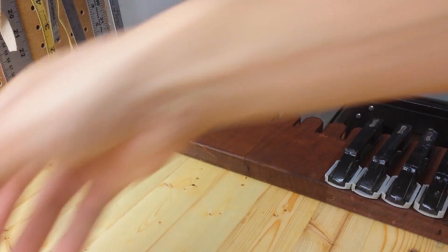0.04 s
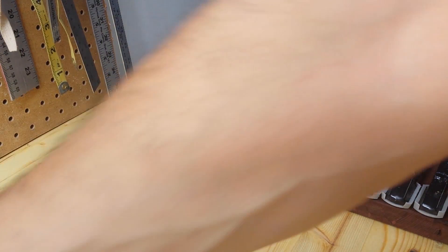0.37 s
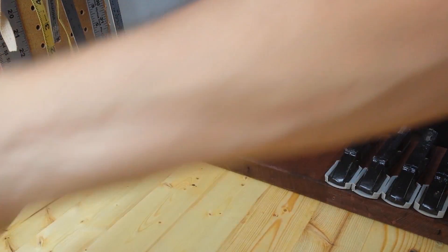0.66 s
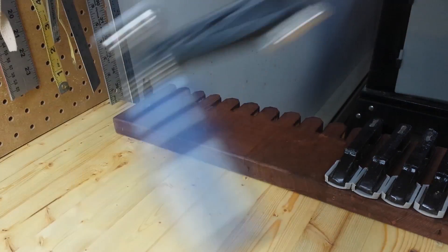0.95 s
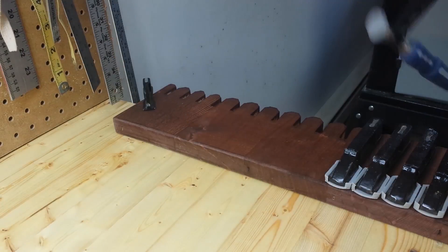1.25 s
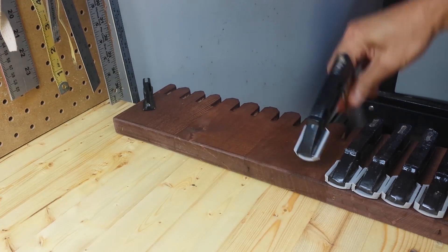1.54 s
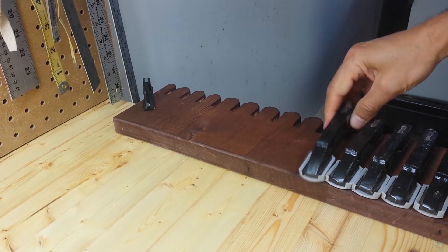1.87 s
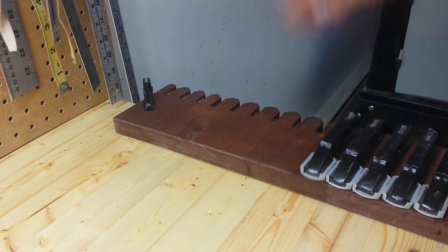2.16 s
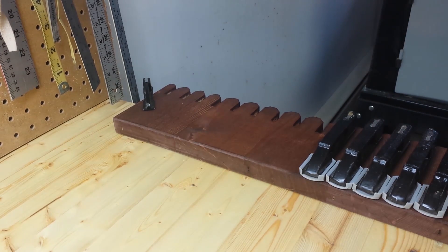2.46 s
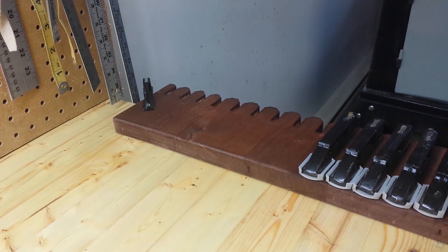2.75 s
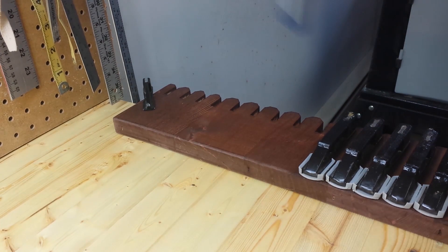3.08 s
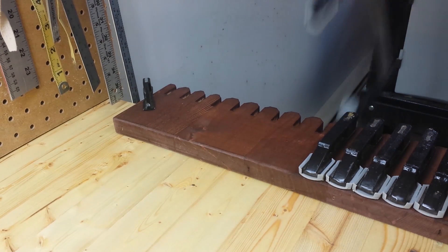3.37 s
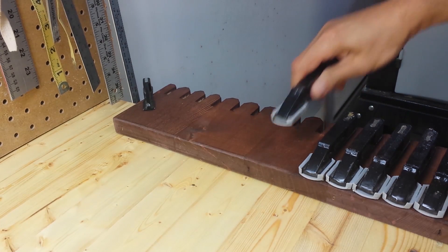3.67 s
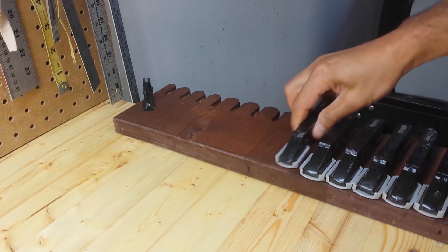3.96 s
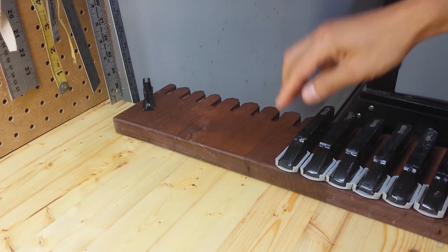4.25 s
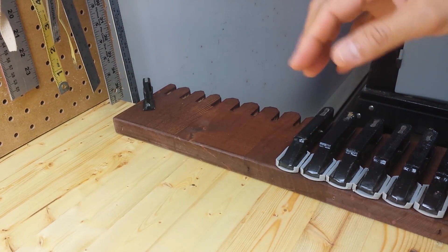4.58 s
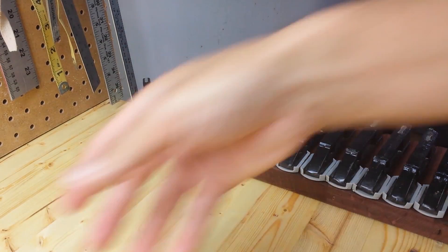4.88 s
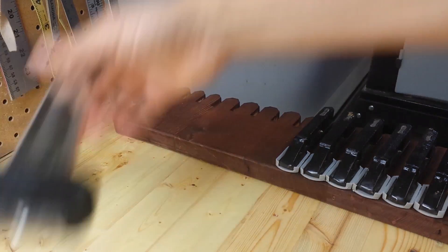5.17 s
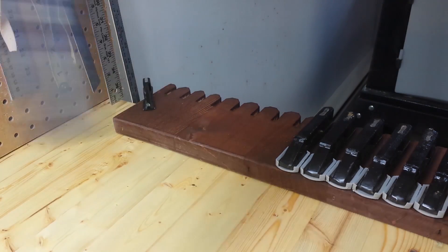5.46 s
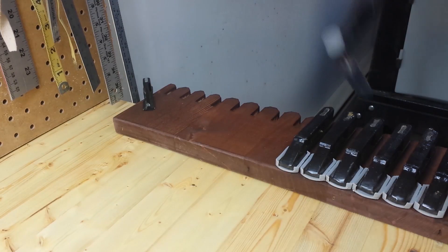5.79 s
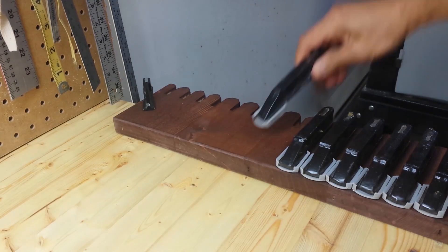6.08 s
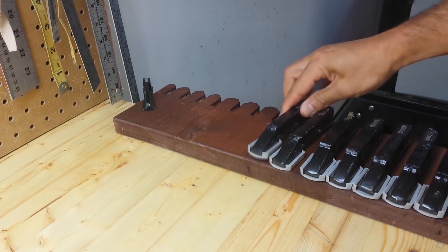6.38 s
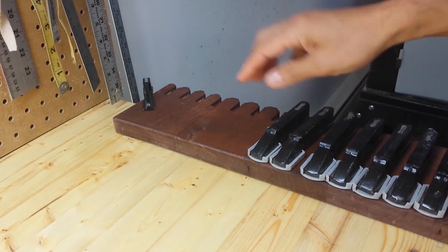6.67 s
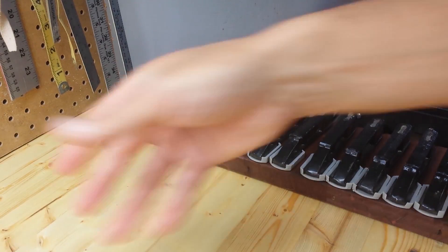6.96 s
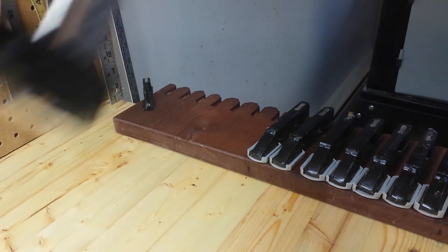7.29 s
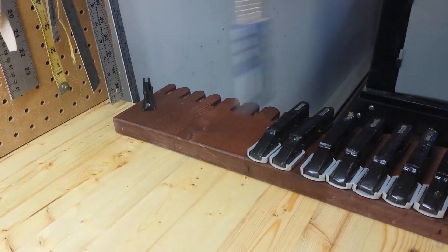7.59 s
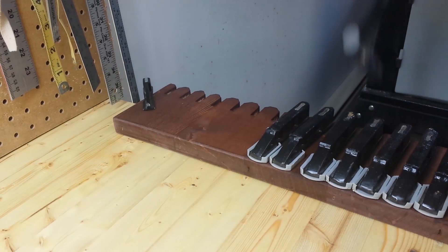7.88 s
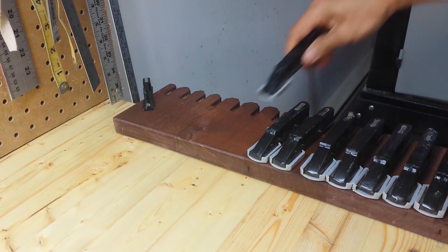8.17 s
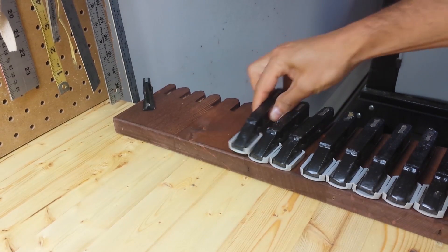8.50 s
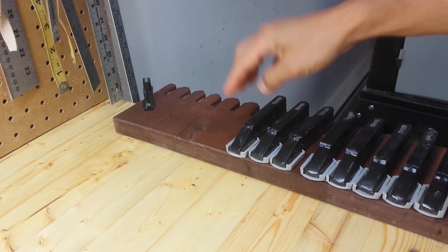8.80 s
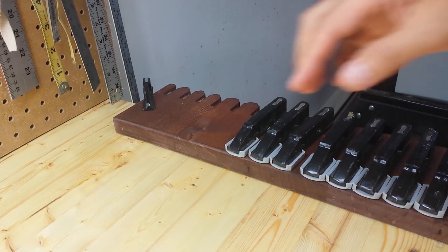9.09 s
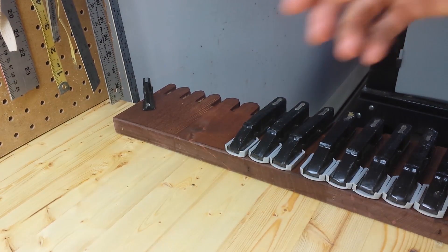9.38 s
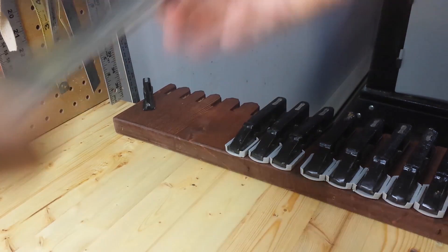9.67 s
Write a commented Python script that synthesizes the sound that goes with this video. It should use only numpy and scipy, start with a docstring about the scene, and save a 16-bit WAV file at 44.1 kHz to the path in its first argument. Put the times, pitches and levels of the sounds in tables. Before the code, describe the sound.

Sharp metal clinks and dull wooden thuds come in bursts as clamps are slid into a slotted rack, with light scraping.

```python
"""Sharp steel clinks and dull wooden knocks: bar clamps are set one by one into a slotted wooden rack.
Loose jaws clink on their bars, the bars knock and rub in the slots, and one jaw chatters down its bar.
Now and then a clamp rings on, or its screw ticks as it is carried. Most sounds are noise or tiny clicks
shaped by resonances, the pitches at which steel and wood like to ring. A small workshop echoes each
blow over a faint steady rumble, and a noise suppressor hushes the hiss in the pauses."""
import sys
import numpy as np
from scipy import signal
from scipy.fft import rfft, irfft
from scipy.io import wavfile
from scipy.ndimage import uniform_filter1d, map_coordinates

SR = 44100
rng = np.random.default_rng(int(sys.argv[2]) if len(sys.argv) > 2 else 0)


def generate_wav(signal):
    """Clip the signal to [-1, 1] and save it as 16-bit WAV at the path in sys.argv[1]."""
    frames = np.transpose(np.atleast_2d(signal))
    scaled = np.clip(frames, -1, 1) * 32767
    pcm = np.round(scaled).astype(np.int16)
    wavfile.write(sys.argv[1], SR, pcm)


N = 438354
T = np.arange(SR // 2) / SR  # the life of one blow, in seconds

# The tone of a struck clamp and of the rack on its bench, without their resonances.
# Each row: frequency in Hz, relative level in dB.
STEEL_TONE = [(500, -25), (1100, -16.5), (1700, -7), (2200, -10), (3000, -9), (3600, -4), (4400, -7.5),
              (5050, -3), (5800, -8.5), (6700, -8), (7700, -12), (10500, -20), (12000, -24.5),
              (15500, -29.5)]
WOOD_TONE = [(25, -31), (48, -2.5), (90, 1), (135, -1.5), (200, -4.5), (300, -5.5), (390, -7.5), (520, -5),
             (780, -8.5), (1000, -14.5), (1300, -22.5), (2500, -31), (6000, -70.5)]
# The resonances of a clamp and of the rack. Each row: frequency in Hz, width in Hz, boost in dB.
CLAMP_RESONANCES = [(2560, 550, 7), (3460, 63, 10.5), (3860, 160, 12), (4160, 170, 5.5), (4700, 130, -1),
                    (4860, 340, 6), (5170, 43, -2), (6300, 56, 9), (7410, 200, 0.5), (8300, 120, 13),
                    (9400, 200, 6), (10650, 410, 11.5), (12980, 280, 10), (15100, 300, 5)]
RACK_RESONANCES = [(143, 12, 2), (164.1, 14, 4.5), (256, 44, 3.5), (344, 33, 2.5), (471, 38, 5),
                   (556, 15, 0.5), (653.4, 17, 3), (772, 18, 1.5)]


def amp(db):
    """Turn decibels into a gain to multiply by."""
    return 10 ** (np.asarray(db) / 20)


def unit(x):
    """Scale a sound to an average (rms) level of 1."""
    return x / np.sqrt(np.mean(x ** 2) + 1e-20)


def unit_peak(x, size):
    """Scale a blow so that its loudest stretch of size samples has an average level of 1."""
    return x / np.sqrt(uniform_filter1d(x * x, size, mode="constant").max())


def along(points, hz):
    """Read a curve through (Hz, value) points, spacing the frequencies by octaves."""
    freqs, values = np.transpose(points)
    return np.interp(np.log(hz + 1), np.log(freqs + 1), values)


def bump(hz, centre, width):
    """A broad hump of height 1."""
    return np.exp(-(2 * (hz - centre) / width) ** 2)


def peaks(resonances, hz, scatter_db, detune):
    """The boost in dB from resonances; grip and striking point change their strength and pitch."""
    centre, width, db = np.transpose(resonances)[:, :, None]
    size, shift = rng.standard_normal((2, *db.shape))
    distance = 2 * (hz - centre * (1 + detune * shift)) / width
    return np.sum((db + scatter_db * size) / (1 + distance ** 2), axis=0)


def colour(x, db_of_hz):
    """Filter a sound by the given number of dB at each frequency."""
    size = 4096
    cepstrum = irfft(np.log(amp(db_of_hz(np.fft.rfftfreq(size, 1 / SR))) + 1e-6))
    # This fold makes the filter ring only after a hit, never before it (minimum phase).
    cepstrum[1:size // 2] *= 2
    cepstrum[size // 2 + 1:] = 0
    response = irfft(np.exp(rfft(cepstrum)))
    return signal.fftconvolve(x, response)[:len(x)]


def fade(t60):
    """Die away by 60 dB in t60 seconds, the fade time."""
    return np.exp(-np.log(1000) * T / np.maximum(t60, 1e-3))


def push_gain(start, length, attack_s, sag_db_per_s, release_db_per_s):
    """The loudness of one movement: it takes hold, eases off, then stops."""
    t = np.maximum(np.arange(N) / SR - start, 0)
    drop_db = sag_db_per_s * t + release_db_per_s * np.maximum(t - length, 0)
    return np.minimum(t / attack_s, 1) * amp(-drop_db)


def grains(rate, spread_db):
    """Tiny random clicks of uneven size, about rate of them a second."""
    clicks = (rng.random(N) < rate / SR) * rng.choice([-1, 1], N)
    return clicks * amp(spread_db * np.clip(rng.standard_normal(N), -2, 2))


def add(track, start, x):
    """Mix x into the track at start seconds."""
    part = track[max(round(start * SR), 0):][:len(x)]
    part += x[:len(part)]


def in_room(x, wet_db):
    """Add the workshop's wash of echoes, at wet_db relative to the direct sound."""
    # How long the room rings. Each row: frequency in Hz, fade time in seconds.
    fade_times = [(60, 0.29), (200, 0.57), (530, 0.54), (1400, 0.52), (3700, 0.34), (7000, 0.34),
                  (14000, 0.29)]
    hz, t, noise = signal.stft(rng.standard_normal(len(T) * 3 // 2), SR, nperseg=256)
    decay = np.exp(-np.log(1000) * t / along(fade_times, hz)[:, None])
    tail = signal.istft(noise * decay, SR, nperseg=256)[1]
    tail *= 1 - np.exp(-np.arange(len(tail)) / SR / 0.001)  # the walls take a moment to answer
    response = amp(wet_db) * tail / np.linalg.norm(tail)
    response[0] = 1  # the direct sound
    return signal.fftconvolve(x, response)


def workshop_air():
    """The faint, steady rumble and hiss of the workshop."""
    # Each row: frequency in Hz, relative level in dB.
    air_tone = [(15, -55.5), (25, -32), (48, -8), (80, -11.5), (114, -2.5), (200, -15.5), (236, -12.5),
                (326, -12.5), (416, -20), (531, -17), (863, -14.5), (1370, -18.5), (2280, -30.5),
                (3820, -30.5), (16000, -39)]
    return amp(-60.5) * unit(colour(rng.standard_normal(N), lambda f: along(air_tone, f)))


def screw_ticks():
    """While a clamp is carried, its loose screw ticks faintly in the thread."""
    # Each row: start and end in seconds, relative level in dB, ticks a second, pitch in Hz.
    carries = [(3.083, 3.26, -31.5, 70, 5450), (4.845, 5.04, -34, 35, 3000), (7.465, 7.71, -41.5, 24, 4120),
               (9.55, 9.85, -47.5, 60, 3200)]
    out = np.zeros(N)
    for start, end, db, rate, hz in carries:
        clicks = grains(rate, spread_db=3.0)[:round((end - start) * SR)]
        ticks = colour(np.pad(clicks, (0, 2048)), lambda f: 24 * (bump(f, hz, width=.7 * hz) - 1))
        add(out, start, amp(db + 11.5) * ticks)
    return in_room(out, wet_db=-8.0)[:N]


def ringing_clamps():
    """A clamp left free rings at a single pitch: low in the handle, high in the bar."""
    # Each row: start in seconds, level in dB, pitch in Hz, fade time in seconds.
    rings = [(.052, -21.5, 470, 0.13), (.112, -32.5, 344, 0.66), (.177, -12.5, 349, 0.046),
             (2.817, -28, 6500, .13), (3.588, -23, 5030, 0.31), (4.244, -19, 3700, 0.13),
             (5.897, -26, 4930, .2), (6.152, -45, 135, 0.076), (6.349, -17.5, 330, 0.033),
             (8.447, -29.5, 6270, 0.32), (8.835, -22, 463, 0.31), (8.836, -12, 269, 0.087),
             (8.837, -12.5, 326, 0.16), (8.959, -28, 324, 0.16), (9.01, -26.5, 338, 0.13)]
    out = np.zeros(N)
    for start, db, hz, t60 in rings:
        note = fade(t60) * np.sin(2 * np.pi * hz * T)
        add(out, start, in_room(amp(db) * note, wet_db=-15.0))
    return out


def uneven_grip(depth_db, changes_per_s):
    """A gain that swells and slackens at random, like the friction on a sliding bar."""
    grips = rng.standard_normal(int(N * changes_per_s / SR) + 4)
    smooth_grip = map_coordinates(grips, [np.arange(N) * changes_per_s / SR])
    return unit(amp(depth_db * np.clip(smooth_grip, -2, 2)))


def rubbing_bars():
    """Sliding bars catch on the slots: the wood grumbles and the steel rasps."""
    # Each row: start and length in seconds, relative levels of the wood and the steel in dB.
    pushes = [(-.01, 0.038, -30.5, -23), (.13, 0.048, -30, -34.5), (1.38, 0.28, -34, -37.5),
              (1.653, 0.071, -25.5, -19.5), (2.258, 0.18, -31, -39.5), (2.497, 0.12, -47, -44),
              (3.444, 0.16, -41, -36.5), (3.594, 0.22, -29, -24.5), (3.856, 0.4, -38.5, -52.5),
              (4.135, .33, -31, -36), (4.224, .03, -23, -28), (4.554, 0.072, -33, -35),
              (5.442, 0.17, -38.5, -51), (5.622, 0.058, -26.5, -38), (5.74, .14, -38.5, -50),
              (5.91, .17, -28, -29.5), (6.153, 0.027, -18.5, -25), (6.26, .22, -36, -43.5),
              (6.5, .13, -37, -41), (8.102, 0.44, -31, -37), (8.641, 0.31, -34, -40.5),
              (8.97, 0.048, -37, -40.5)]
    wood_gain, steel_gain = np.zeros((2, N))
    for start, length, wood_db, steel_db in pushes:
        push = push_gain(start, length, attack_s=0.033, sag_db_per_s=11.5, release_db_per_s=189)
        wood_gain += amp(wood_db - 7) * push
        steel_gain += amp(steel_db - 8.5) * push
    lightness = [(55, -3), (120, 1.5), (500, -4), (1200, -1)]  # a light touch hardly moves the bench
    softness = [(1200, -0.5), (3500, 1.5), (6000, 3), (9000, -9)]
    grumble = colour(grains(rate=230, spread_db=2),
                     lambda f: along(WOOD_TONE, f) + along(lightness, f)
                     + peaks(RACK_RESONANCES, f, scatter_db=-0.5, detune=0))
    rasp = colour(grains(rate=900, spread_db=2),
                  lambda f: along(STEEL_TONE, f) + along(softness, f)
                  + .5 * peaks(CLAMP_RESONANCES, f, scatter_db=-3.5, detune=0))
    steel_gain *= uneven_grip(depth_db=2.5, changes_per_s=45)
    return in_room(wood_gain * unit(grumble) + steel_gain * unit(rasp), wet_db=-8)[:N]


def sliding_jaw():
    """A loose jaw runs down the ridged bar in a burst of tiny hits that ring them both."""
    # The jaw catches twice, making three runs. Each row: start and length in seconds, relative level in dB.
    runs = [(1.954, 0.071, -14.5), (2.043, .08, -19.5), (2.174, 0.012, -21.5)]
    # The tone of the chatter. Each row: frequency in Hz, relative level in dB.
    chatter_tone = [(120, -40.5), (200, -12.5), (358, -13), (554, -9), (653, -12.5), (798, -6.5),
                    (957, -14.5), (1380, -7.5), (1540, -8), (1680, -7.5), (2750, -14.5), (3240, -11.5),
                    (3890, -14.5), (5010, -12), (15500, -58)]
    # The resonances of jaw and bar. Each row: frequency in Hz, width in Hz, boost in dB.
    jaw_resonances = [(460, 27, 5), (555, 29, 8), (660, 40, 5.5), (785, 40, 3.5), (1280, 61, -1),
                      (1294, 35, 4), (1390, 45.6, 6), (1653, 41, 4), (1607, 40, 5.5), (1850, 45, 4.5),
                      (2590, 50, 8), (2920, 60, 7), (3100, 50, 5.5), (3260, 90, 6.5), (3520, 34, 5.5),
                      (3900, 54, 4.5), (4800, 130, 7)]
    gain = np.zeros(N)
    for start, length, db in runs:
        gain += amp(db) * push_gain(start, length, attack_s=.004, sag_db_per_s=65.5, release_db_per_s=240)
    hits = colour(grains(rate=1100, spread_db=2.5),
                  lambda f: along(chatter_tone, f) + peaks(jaw_resonances, f, scatter_db=-0.5, detune=0))
    low = unit(colour(hits, lambda f: along([(1300, -1.5), (2600, -18.0)], f)))
    high = unit(colour(hits, lambda f: along([(900, -28.0), (2000, 2.5)], f)))
    return in_room(gain * (amp(-0.4) * low + amp(-0.06) * high), wet_db=-5.0)[:N]


def knocking_bars():
    """A bar drops against the rack, which thuds on the bench top."""
    # Each row: start in seconds, relative level in dB, hollowness (the middle pitches) in dB,
    # most strongly boosted frequency in Hz.
    knocks = [(.002, -17, -12.5, 158), (.052, -21, -14.5, 362), (.175, -20, -6, 345),
              (1.364, -15.5, -2, 142), (1.506, -15, -0.5, 154), (1.665, -7.5, -1.5, 150),
              (1.677, -8.5, -13.5, 169.8), (1.729, -18, 2.5, 339.2), (1.833, -17, -4.5, 553),
              (1.853, -15, -11.5, 158), (1.958, -22, -0.5, 635.5), (2.04, -13, 4, 570),
              (2.12, -16, -8.5, 167.7), (2.319, -23.5, -10, 176.5), (3.439, -15.5, -5, 167),
              (3.586, -23, 7, 820), (3.62, -20, -19, 151), (3.7, -13, 2, 520), (3.717, -17, -3.5, 514),
              (3.833, -17, -9.5, 265), (3.951, -25.5, -4, 240), (4.157, -25, -17, 107),
              (4.187, -23.5, -30, 116), (4.226, -20, 4.5, 394), (4.248, -16, -4, 102),
              (4.407, -23, -16.5, 418), (4.561, -19.5, -7.5, 147), (4.852, -38, -2.5, 353),
              (5.147, -36.5, -9, 235), (5.428, -36, -10, 262), (5.463, -31.5, -18, 110),
              (5.511, -26.5, -16, 159), (5.662, -15.5, -13.5, 269), (5.697, -17.5, -24, 110),
              (5.765, -22, -13.5, 174), (5.85, -25, -11, 302), (5.895, -19, -4, 330), (5.928, -24, 3, 526),
              (6.102, -13, -11, 130), (6.148, -9, -2, 574), (6.167, -13, -16.5, 143),
              (6.235, -24.5, 4.5, 550), (6.344, -23, -3.5, 305), (8.082, -22.5, 4, 427),
              (8.286, -17.5, 0, 570), (8.413, -21, 3, 136), (8.432, -19, -12, 168),
              (8.481, -23.5, -2.5, 144), (8.624, -27.5, -8, 136), (8.722, -26.5, -9.5, 140.2),
              (8.834, -17.5, 1.5, 327)]
    out = np.zeros(N)
    for start, db, hollow_db, hz in knocks:
        t60 = np.interp(db, [-22, -7], [.095, .045])  # a firm knock is held to the wood and dies sooner
        push = rng.standard_normal(len(T)) * fade(t60)
        push *= 1 - fade(0.024)  # wood gives before it pushes back
        weight = [(30, -11.5), (70, -9.5), (130, 0), (340, 0), (520, hollow_db + 3.5)]

        def tone_db(f):
            resonances = peaks(RACK_RESONANCES, f, scatter_db=1.5, detune=0.0081)
            favoured = 5 * bump(f, hz, width=hz / 2)
            return along(WOOD_TONE, f) + along(weight, f) + resonances + favoured

        thud = unit_peak(colour(push, tone_db), size=512)
        gain = amp(db - 6) * np.hypot(1, amp(hollow_db))
        add(out, start, in_room(gain * thud, wet_db=-6.5))
    return out


def clinking_jaws():
    """A loose jaw cracks against its bar, then rattles; harder contacts sound brighter."""
    # Each row: start in seconds, relative level in dB, clack (near 2 kHz) in dB,
    # sparkle (over 8 kHz) in dB, frequency in Hz that the striking point favours.
    clinks = [(.0024, -20, -17.5, -34.5, 4000), (0.0271, -17.5, -10.5, -44.5, 5940),
              (0.1128, -31, -2.5, -26.5, 2400), (0.1439, -22, -9, -39.5, 3220), (.156, -21, -7, -40, 3300),
              (0.1727, -23, -7.5, -44, 3360), (0.212, -24.5, -11, -39, 2540),
              (0.3302, -8, -13, -22.5, 3560), (.3384, -21.5, -9, -38, 3640), (.4015, -26, -17, -39, 4540),
              (.4068, -23.5, -9, -51, 3650), (1.3647, -23.5, -3, -25, 3400),
              (1.507, -23.5, -6.5, -29.5, 5160), (1.635, -29, -0.5, -19.5, 5300),
              (1.6655, -16, 0, -26.5, 3900), (1.698, -17, -21.5, -23, 4800),
              (1.7155, -11.5, -24.5, -22.5, 4500), (1.8336, -19.5, -1, -39.5, 3760),
              (1.955, -6, -12, -28, 3150), (2.175, -12, -2.5, -27, 4650), (2.2632, -22.5, -6.5, -36, 4850),
              (2.5607, -22.5, -13, -27, 3200), (2.5934, -24.5, -10.5, -26, 5430),
              (2.819, -6, -30.5, -18, 4800), (3.441, -17, -8.5, -26, 4920), (3.459, -20, -19, -32.5, 4930),
              (3.5886, -6, -30.5, -21, 4860), (3.622, -13, -23, -19.5, 3560),
              (3.6836, -9.5, -42, -26.5, 6370), (3.7015, -6.5, -27, -27, 5140),
              (3.8732, -21, -18, -43, 3800), (3.9514, -20.5, -10.5, -19.5, 6200),
              (4.0887, -28, -22, -48, 3800), (4.233, -14.5, -28, -26, 3930), (4.2428, -7, -32.5, -21, 4850),
              (4.3496, -13, -6.5, -29, 5850), (4.406, -32, -23, -38, 3280), (4.4883, -28, -8, -41, 3450),
              (4.5572, -15.5, -4, -39, 4940), (4.5628, -10.5, -0.5, -33.5, 2650),
              (4.988, -36.5, -5.5, -31.5, 3900), (5.0517, -27.5, -15.5, -17, 3840),
              (5.117, -20.5, -23, -27, 3870), (5.136, -21, -11.5, -13.5, 5040),
              (5.1441, -6.5, -25, -16.5, 5220), (5.4294, -20, -13, -22, 3900), (5.6397, -25, -8, -40, 3530),
              (5.6566, -17, -9.5, -36, 5150), (5.678, -17, -17, -28, 3800), (5.7114, -18.5, -30, -31, 2970),
              (5.8467, -30, -5, -33.5, 3550), (5.8955, -8.5, -32, -25.5, 4700),
              (5.908, -9.5, -25, -24, 3600), (5.9284, -9.5, -48, -15.5, 5070),
              (6.0733, -20.5, -6.5, -35, 3680), (6.103, -8, -24.5, -28, 4100), (6.118, -11, -15, -19, 4850),
              (6.1487, -11.5, -5.5, -30, 4600), (6.161, -5, -41.5, -20, 6730),
              (6.2334, -12.5, -18, -20, 4540), (6.3481, -23.5, -8, -43, 3560),
              (6.448, -28.5, -8, -39, 4060), (6.6052, -33, -6, -29, 3630),
              (6.9257, -26, -15.5, -34.5, 2750), (7.1522, -22.5, -32.5, -28, 3600),
              (7.1655, -4.5, -21, -13.5, 5330), (7.1764, -6.5, -42.5, -23.5, 4700),
              (8.085, -17.5, -11, -28.5, 4930), (8.1076, -11.5, -34, -19, 4840),
              (8.136, -16, -33, -28, 5000), (8.1811, -13.5, -15.5, -26, 4700),
              (8.2203, -15.5, -29, -25, 5030), (8.2838, -14.5, -24, -21, 3920),
              (8.2943, -10.5, -32.5, -23.5, 6300), (8.3128, -12, -43, -20, 5340),
              (8.334, -14, -15.5, -25, 5800), (8.4317, -17.5, -22.5, -25, 3670),
              (8.4451, -12.5, -46, -29.5, 5670), (8.4941, -20, -36.5, -30, 6260),
              (8.6582, -21.5, -18, -39.5, 3580), (8.712, -27.5, -26, -45, 3600),
              (8.8412, -16, -15, -32, 3800), (9.031, -31, -4, -41, 2300), (9.6782, -38.5, -7, -20, 3000)]
    # When a clamp is being worked into its slot. Each row: start and end in seconds.
    seating_times = [(1.35, 2.25), (3.4, 4), (5.6, 6.3), (8.05, 8.37)]
    out = np.zeros(N)
    for start, db, clack_db, sparkle_db, hz in clinks:
        contact = rng.standard_normal(len(T)) * fade(0.032)
        rattle = amp(-22) * unit(grains(rate=1000, spread_db=-1.5)[:len(T)]) * fade(0.14)
        hardness = [(40, -21.5), (150, -2), (600, -1.5), (1900, clack_db + 13), (3200, -0.5), (6500, 0.5),
                    (8300, sparkle_db + 19.5), (9500, sparkle_db + 16), (11500, sparkle_db + 13)]
        # A firm blow wakes all the resonances, a light tap mostly the favoured one.
        firmness = np.interp(db, [-35, -10], [.35, .85])

        def tone_db(f):
            resonances = firmness * peaks(CLAMP_RESONANCES, f, scatter_db=4.5, detune=0.018)
            favoured = 11 * bump(f, hz, width=1000)
            return along(STEEL_TONE, f) + along(hardness, f) + np.maximum(resonances, favoured)

        blow = unit_peak(colour(contact + rattle, tone_db), size=128)
        # A clamp pressed against the rack sounds fuller in the room than a loose one.
        pressed = any(begin < start < end for begin, end in seating_times)
        add(out, start, in_room(amp(db - 6.5) * blow, wet_db=-2.5 if pressed else -7))
    return out


def noise_suppressor(x):
    """Turn the treble down whenever the sound falls quiet."""
    shut_db, open_db, depth_db, treble_hz = -68, -48.5, 15.5, 7000
    level_db = 10 * np.log10(np.abs(uniform_filter1d(x * x, size=2048)) + 1e-12)
    treble = signal.sosfiltfilt(signal.butter(2, treble_hz, "high", fs=SR, output="sos"), x)
    treble_gain = amp(np.interp(level_db, [shut_db, open_db], [-depth_db, 0]))
    return x - treble * (1 - treble_gain)


def scene():
    """Mix the clamps and the workshop into one channel."""
    blows = clinking_jaws() + knocking_bars() + ringing_clamps()
    return (blows + rubbing_bars() + sliding_jaw() + screw_ticks() + workshop_air())[None]


def record(dry):
    """Add microphone hiss, hush it in the pauses, round off the loudest peaks and cut the top treble."""
    # Each row: frequency in Hz, relative level in dB.
    hiss_tone = [(3000, -39.5), (6000, -9), (9000, -2.5), (16000, -0.5)]
    hiss = amp(-70.5) * unit(colour(rng.standard_normal(N), lambda f: along(hiss_tone, f)))
    hushed = noise_suppressor(dry + hiss)
    rounded = hushed / (1 + np.abs(hushed / .9) ** 4) ** (1 / 4)
    top_hz = 15700
    return signal.sosfilt(signal.ellip(10, .1, 80, top_hz, fs=SR, output="sos"), rounded)


dry = scene()
out = record(dry)
generate_wav(out)
```